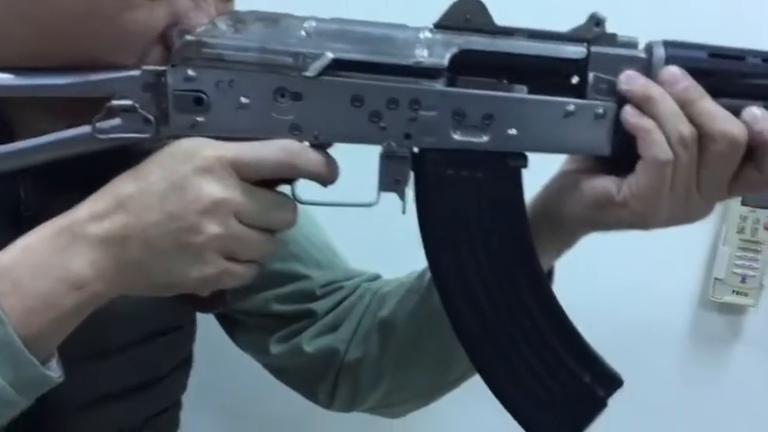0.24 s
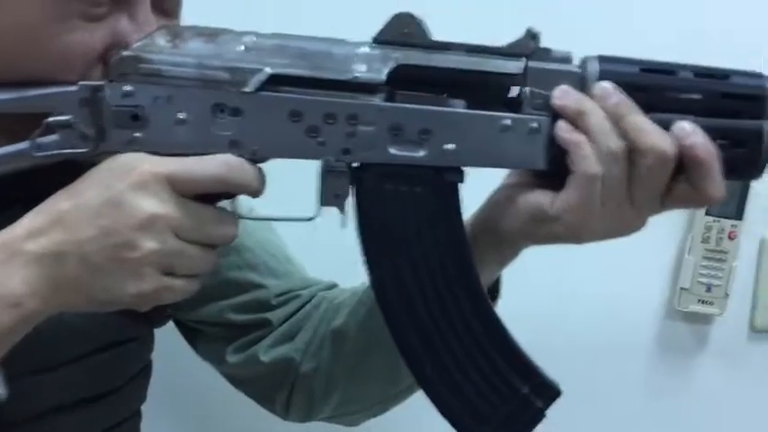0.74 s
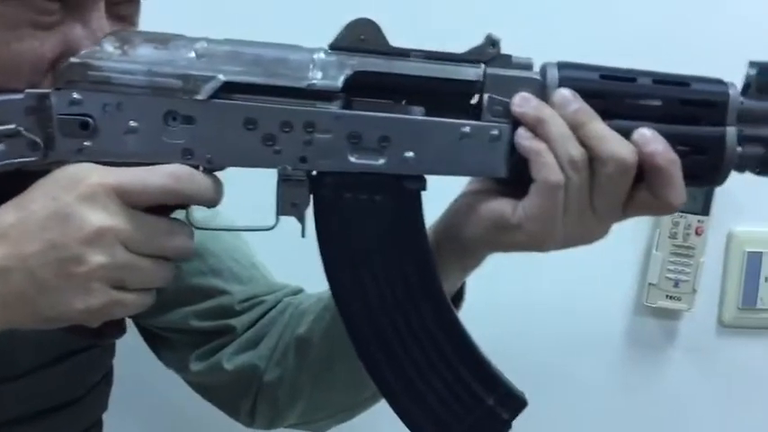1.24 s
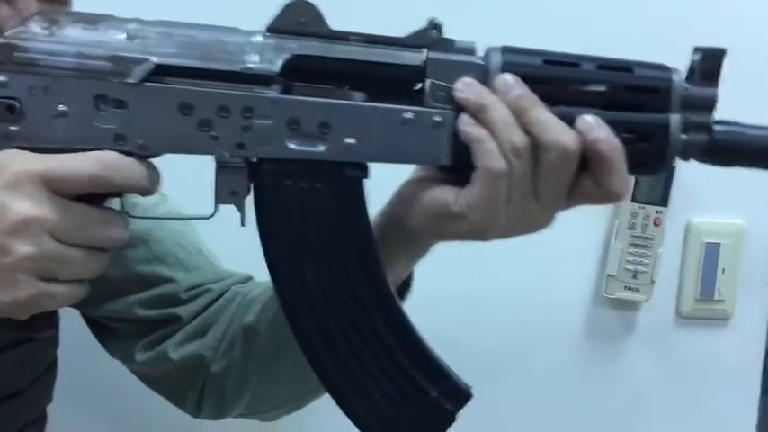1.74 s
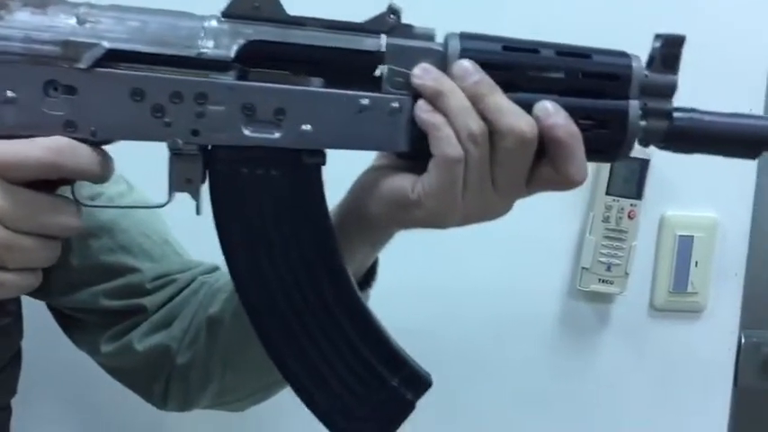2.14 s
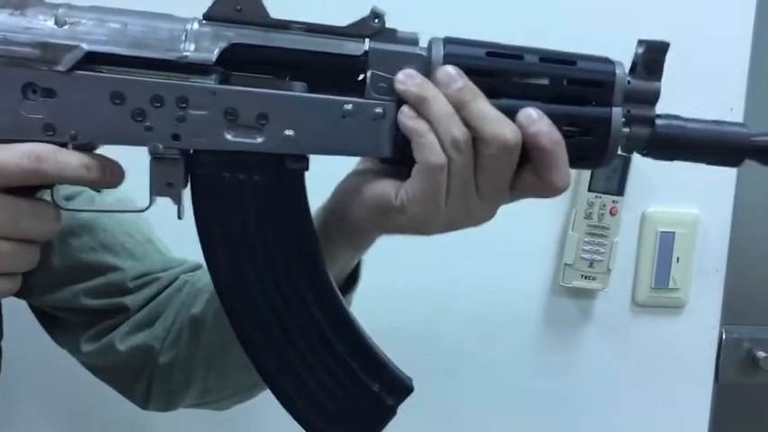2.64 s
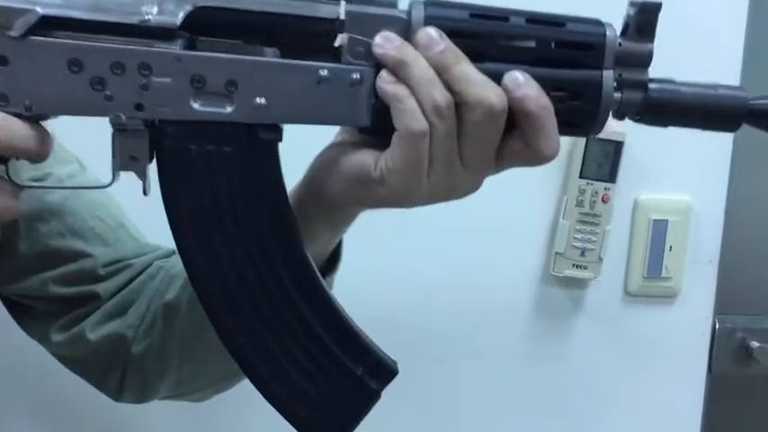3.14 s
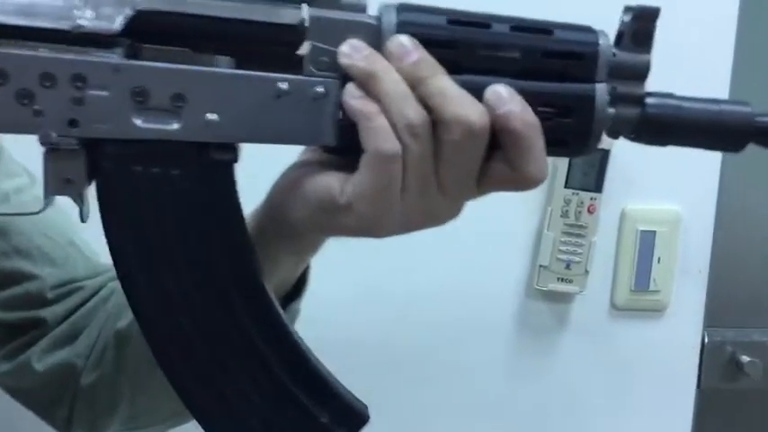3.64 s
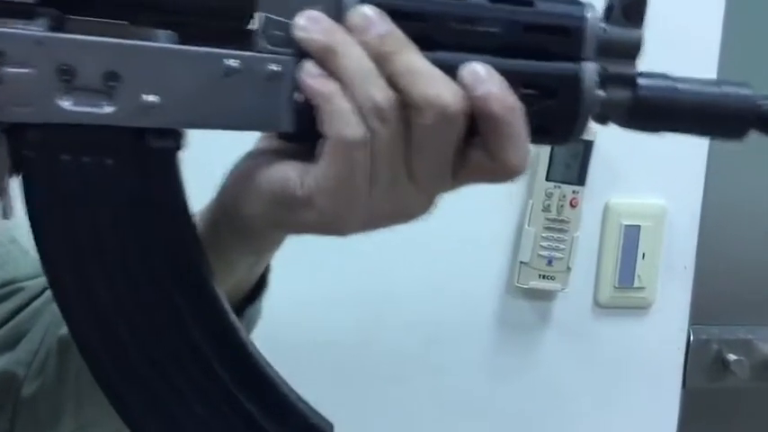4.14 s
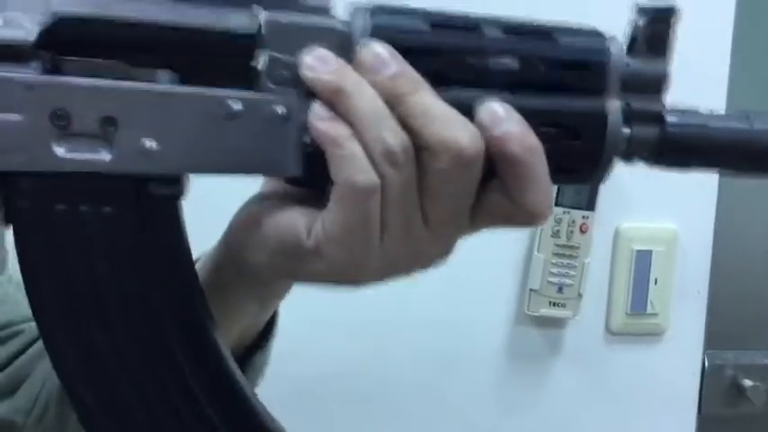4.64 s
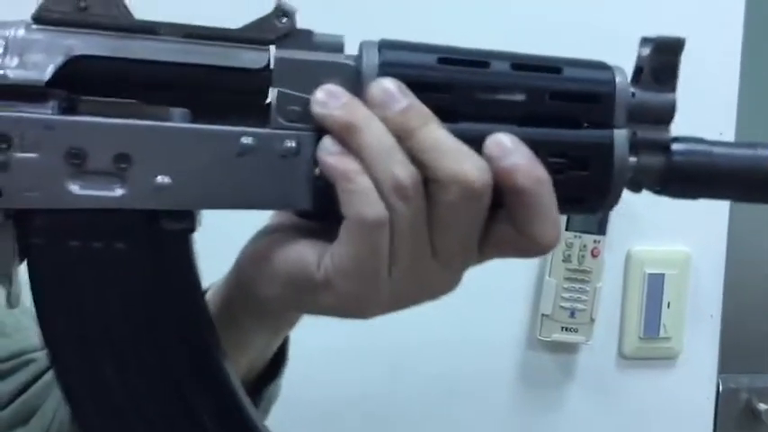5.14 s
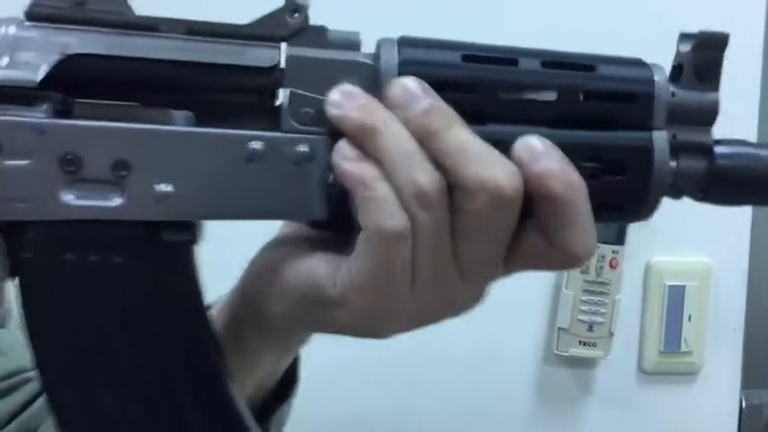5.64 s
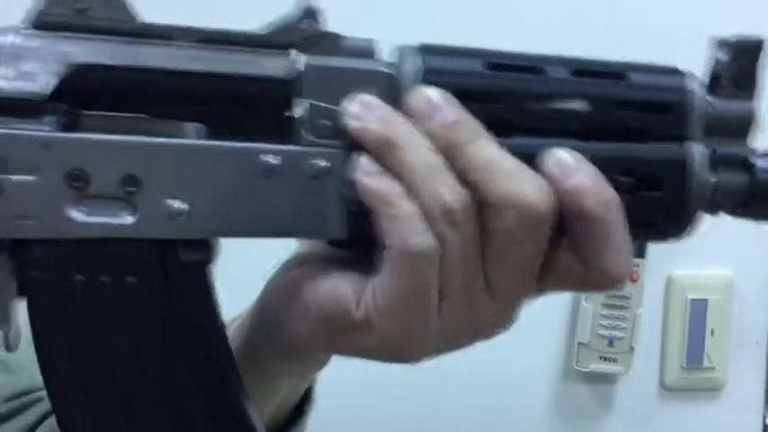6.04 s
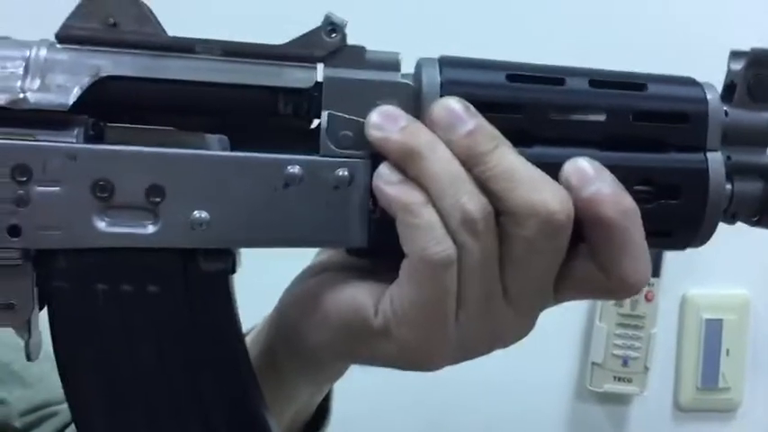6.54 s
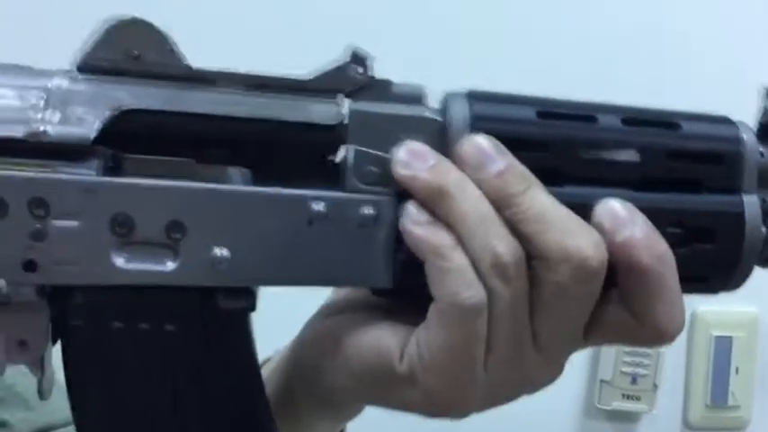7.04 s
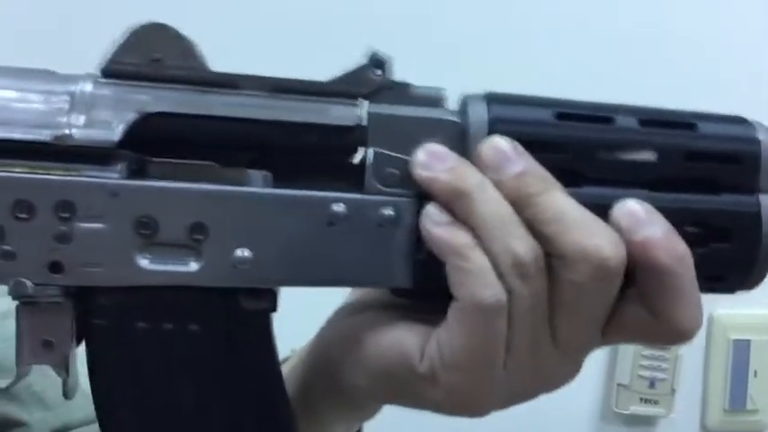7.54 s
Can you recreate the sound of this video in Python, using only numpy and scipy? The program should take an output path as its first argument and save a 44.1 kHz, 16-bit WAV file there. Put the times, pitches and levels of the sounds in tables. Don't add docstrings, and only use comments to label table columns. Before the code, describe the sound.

Close to a phone microphone in a small hard-walled room, cloth rustles faintly, then an electric airsoft rifle fires a long full-auto burst of popping, slamming metal cycles at about fourteen a second. After a short quiet gap comes a longer burst, then another brief pause and a third burst still running at the end. Gears whine throughout and the loudest slams overload.

```python
import sys
import numpy as np
from scipy import signal
from scipy.fft import rfft, irfft, next_fast_len
from scipy.io import wavfile
from scipy.ndimage import map_coordinates

SR = 44100
rng = np.random.default_rng(int(sys.argv[2]) if len(sys.argv) > 2 else 0)


def ratio_of_db(decibels):
    return 10 ** (np.asarray(decibels, float) / 20)


def materialize(psi):
    bounded = np.clip(np.atleast_2d(psi).T, -1, 1)
    quanta = np.round(bounded * 32767).astype(np.int16)
    wavfile.write(sys.argv[1], SR, quanta)


N = 343539

# (time [s], level [dB])
CLOTH_LEVEL = [(0, -62.5), (.1, -62.5), (.19, -64), (.22, -80.5), (.33, -84), (.345, -65), (.4, -67),
               (.44, -81), (.54, -61)]
# (frequency [Hz], level [dB per Hz])
CLOTH_COLOUR = [(300, -42), (600, -16), (2200, 2.5), (5500, -4.5), (7500, -6.5), (12000, -7.5),
                (15500, -17), (16000, -70)]
# (frequency [Hz], level [dB per Hz])
AIR_COLOUR = [(25, -25.5), (60, -13.5), (128, -12.5), (300, -23.5), (1200, -23), (4700, -31), (9000, -36.5),
              (16000, -69.5)]
# (time [s], gain [dB])
BACKGROUND_GAIN = [(0, 0), (.5, 5), (.6, 4), (3.17, -4), (6.7, -6)]
# (start [s], frequency [Hz], level [dB], 60 dB fade [s])
RINGING_SPRING = (6.365, 11017, -62, 1.4)
# (frequency [Hz], 60 dB fade [s])
ROOM_FADE = [(100, 0.1), (270, 0.74), (500, 0.43), (1000, 0.42), (4000, 0.67), (8000, 0.5), (15000, 0.26)]
# (frequency [Hz], level [dB])
ROOM_COLOUR = [(100, 7.5), (300, -0.5), (1000, -2.5), (4000, -12.5), (8000, -4.5), (15000, -4)]
# (delay [ms], level [dB])
WALL_ECHOES = [(8.6, -7), (16.3, -12), (24, -16)]

# (shot number [count], time [s])
SHOT_CLOCK = [
    [(0, .6054), (1, .6587), (7, 1.0706), (16, 1.6922), (29, 2.593), (30, 2.6631)],
    [(0, 3.2487), (1, 3.324), (8, 3.8121), (23, 4.8625), (37, 5.8464), (44, 6.3422)],
    [(0, 6.7648), (1, 6.8435), (9, 7.4098), (14, 7.7653)],
]
# (opening lift [dB], settling time [s], extra tick level [dB])
BURST_OPENING = [
    (6, 0.36, -3),
    (6, 0.2, 2.5),
    (3, 0.29, 4),
]
CYCLE_PARTS = {"piston": (-9.5, 0.98, 0.44), "tick": (-11.3, .6, 1.1), "slam": (-2.5, 0.48, .6),
               "bounce": (-8.5, .7, 0.66), "stock": (-24, 2.4, 1), "jolt": (-47, .2, 3)}
# (time [s], piston change [dB], extra bolt delay [ms], tick change [dB])
ODD_SHOTS = [
    (1.76, -3.5, 0, 0),
    (1.83, -0.5, 0, 1),
    (1.9, -2.5, 0.088, -1.5),
    (2.66, -3, 0.97, -3),
    (4.23, -3.5, .3, 5),
    (7.62, -2, 0, -4),
    (.61, 2, 0.84, 0.5),
    (6.76, 1, .8, -6),
    (2.8, 1, .4, 1),
]
# (time of the thump [s], level [dB])
HARD_JOLTS = [(0.625, -32), (3.264, -40), (3.325, -35.7), (3.431, -34.4), (3.778, -36.9), (4.13, -34),
              (4.266, -31), (4.478, -29.8), (4.617, -31), (4.76, -35), (5.109, -30), (5.601, -30),
              (5.668, -35.6), (5.743, -33), (5.814, -37), (5.879, -40), (5.952, -32.7), (6.167, -31),
              (6.236, -36), (6.306, -39), (6.376, -41), (6.881, -34), (6.946, -34), (7.017, -36.7),
              (7.092, -40), (7.376, -34), (7.517, -35.9), (7.66, -29.9)]

# (pull [s], release [s], running level [dB], starting strain [dB], coasting fade [dB per s])
TRIGGER_PULLS = [
    (.5505, 2.69, -20.5, 9, -180),
    (3.18, 6.36, -21.5, 8.5, -400),
    (6.706, 7.8, -21.5, 2.5, -300),
]
# (time after the piston [ms], frequency [Hz], level over the grind [dB])
WHINE_CYCLE = [
    (0, 3100, -14),
    (20, 3200, -12),
    (32, 3220, -7),
    (44, 3180, -2),
    (52, 3020, 1),
    (59, 2880, -1),
    (64, 2850, -12),
    (80, 2850, -16),
    (110, 2400, -30),
]
WHINE_WARMING = [
    -3.5,
    0.5,
    .3,
]
# (start [s], length [s], first pitch [Hz], last pitch [Hz], level [dB])
SPIN_UP_SQUEALS = [
    (0.555, 0.023, 800, 830, -16.5),
    (0.579, 0.013, 1500, 1630, -5),
    (0.588, 0.023, 1690, 1950, -15.5),
    (3.206, 0.017, 1436, 1720, -13),
    (3.234, 0.011, 1930, 2080, -12),
    (6.717, 0.021, 810, 855, -26.5),
    (6.738, 0.016, 1467, 1750, -13.5),
    (6.758, 0.016, 1785, 1950, -19),
]
# (frequency [Hz], width [Hz], level [dB])
GEARBOX_MODES = [(830, 197, -7.5), (1119, 78, -2.5), (1300, 860, -9), (2080, 1060, -6.5),
                 (3050, 1250, -6.5), (4500, 620, -8.5), (6010, 1030, -11.5), (9600, 850, -11.5),
                 (14000, 12000, -18)]
# (frequency [Hz], level [dB])
TICK_COLOUR = [(300, -25), (1000, -17), (2500, -16), (4000, 2), (5800, 4), (8000, -10.5), (12000, 1),
               (15200, 1.5)]

# (delay after the piston [ms], level under the slam [dB], 60 dB fade [ms])
RATTLE_HITS = [
    (5, -15, 12),
    (14, -20, 10),
    (17.8, -11, 8),
    (32.8, -13, 14),
]
# (time [s], level [dB])
LOOSE_CLICKS = [(0.384, -66.5), (0.5564, -20), (0.641, -10.5), (2.715, -22.5), (2.785, -45.5),
                (2.9947, -55), (3.1915, -37), (3.2856, -9.5), (3.3003, -7.5), (6.387, -21), (6.41, -26),
                (6.6044, -51), (6.713, -45), (6.799, -9.5)]
# (frequency [Hz], width [Hz], level [dB])
RECEIVER_MODES = [(665, 200, -4.5), (836, 70, 2), (1394, 158, 1), (1950, 180, -1), (2390, 220, -1.5),
                  (3084, 91, 6.5), (3506, 280, 1), (3880, 140, 2.5), (4380, 370, -1), (5530, 910, -3),
                  (7050, 430, -2.5), (8920, 1500, -7), (11200, 1200, -6), (13500, 2200, -9.5)]
# (frequency [Hz], width [Hz], level [dB])
CRACK_MODES = [(5930, 660, -5), (6530, 600, -0.5), (8900, 760, -5), (11870, 900, -2), (14100, 600, 0),
               (15500, 700, -2.5)]
# (frequency [Hz], width [Hz], level [dB])
FRAME_MODES = [(131.4, 21, -15), (159, 95, -11), (255.5, 1.8, -13), (260.9, 9, -2.5), (330, 280, -12)]
# (frequency [Hz], width [Hz], level [dB])
STOCK_MODES = [(279.4, 37, 2)]
# (frequency [Hz], width [Hz], level [dB])
CYLINDER_MODES = [(443, 102, -6), (536, 68, -2.5), (774, 67, -6.5), (866.6, 75, 4), (1514, 76, -10),
                  (1950, 92, -2), (3190, 160, -2), (3900, 1000, -22)]
# (frequency [Hz], level [dB])
PUFF_COLOUR = [(300, -29.5), (700, 2.5), (1000, 4), (3000, -1.5), (4500, -1), (6000, -7.5), (10000, -4.5),
               (15000, -7.5)]

AIR_DB, HUM_HZ, HUM_DB = -69, 122, -70
BOLT_MS, BOLT_SCATTER_MS, LAST_BOUNCE_DB = 21.7, 0.35, -3.5
SPIN_UP_S, SILENT_DB, STRAIN_S, EASE_S = 0.009, -27.5, 0.17, 0.13
JOLT_AFTER_S, JOLT_USUAL_DB, JOLT_HZ, JOLT_WIDTH_HZ = 0.036, -46, 71.6, 68
FRAME_S, STOCK_S = 0.002215, 0.00926


def unit(x):
    return x / np.sqrt(np.mean(x ** 2) + 1e-20)


def along(points, hz):
    f, value = np.transpose(points)
    return np.interp(np.log(hz + 1), np.log(f + 1), value)


def filtered(x, response):
    m = next_fast_len(N + SR // 2)
    return irfft(rfft(x, m) * response(np.fft.rfftfreq(m, 1 / SR)), m)[:N]


def resonant(x, modes, sign=-1):
    def response(f):
        total = 0
        for k, (center, width, db) in enumerate(modes):
            damping = 1j * f * width
            total = total + sign ** k * ratio_of_db(db) * damping / (center * center - f * f + damping)
        return total
    return filtered(x, response)


def coloured(x, spectrum):
    return filtered(x, lambda hz: ratio_of_db(along(spectrum, hz)))


def high(x, hz):
    return signal.sosfilt(signal.butter(4, hz, "high", fs=SR, output="sos"), x)


def thin(x, hz):
    return filtered(x, lambda f: f ** 4 / (f ** 4 + hz ** 4))


def wobble(rate):
    knots = rng.standard_normal(int(N * rate / SR) + 4)
    return map_coordinates(knots, [np.arange(N) * rate / SR])


def bursts(s, db, rise_ms, t60_ms, same=0.3):
    t_ms = np.arange(SR // 20) / SR * 1000
    shape = (1 - np.exp(-t_ms / rise_ms)) * ratio_of_db(-60 * t_ms / t60_ms)
    at = np.round(np.asarray(s) * SR).astype(int)[:, None] + np.arange(len(t_ms))
    repeated = same ** 0.5 * rng.standard_normal(len(t_ms))
    fresh = (1 - same) ** 0.5 * rng.standard_normal(at.shape)
    rows = shape * (repeated + fresh)
    rows = rows * np.linalg.norm(shape) / np.linalg.norm(rows, axis=1, keepdims=True)
    return np.bincount(at.ravel(), (ratio_of_db(db)[:, None] * rows).ravel(), N + SR)[:N]


def background():
    t = np.arange(N) / SR
    air = ratio_of_db(AIR_DB) * unit(coloured(rng.standard_normal(N), AIR_COLOUR))
    hum = ratio_of_db(HUM_DB + 2.5 * wobble(12)) * np.sin(2 * np.pi * HUM_HZ * t)
    cloth_db = np.interp(t, *np.transpose(CLOTH_LEVEL), right=-120) + 1.5 * wobble(60)
    cloth = ratio_of_db(cloth_db) * unit(coloured(rng.standard_normal(N), CLOTH_COLOUR))
    start, hz, db, t60 = RINGING_SPRING
    spring = (t > start) * ratio_of_db(db - 60 * abs(t - start) / t60) * np.sin(2 * np.pi * hz * t)
    gain = ratio_of_db(np.interp(t, *np.transpose(BACKGROUND_GAIN)))
    return (air + hum) * gain + cloth + spring


def room(x):
    hz, t, z = signal.stft(rng.standard_normal(SR), SR, nperseg=256)
    fade = ratio_of_db(-60 * t / along(ROOM_FADE, hz)[:, None])
    tail = signal.istft(z * fade, SR, nperseg=256)[1]
    delayed = np.pad(x, (400, 0))
    return coloured(signal.fftconvolve(delayed, tail / np.linalg.norm(tail))[:N], ROOM_COLOUR)


def nearest(s, rows):
    when, *columns = np.transpose(rows)
    at = np.abs(s[:, None] - when).argmin(axis=0)
    return [np.bincount(at, column, len(s)) for column in columns]


def cycles():
    s, lift, tick, last = [], [], [], []
    for points, (lift_db, settle_s, tick_db) in zip(SHOT_CLOCK, BURST_OPENING):
        number, when = np.transpose(points)
        own = np.interp(np.arange(number[-1] + 1), number, when)
        s = np.append(s, own)
        lift = np.append(lift, lift_db * np.exp(-(own - own[0]) / settle_s))
        tick = np.append(tick, tick_db + 0 * own)
        last = np.append(last, own == own[-1])
    odd_db, later_ms, odd_tick_db = nearest(s, ODD_SHOTS)
    hard_jolts = [(when, db - JOLT_USUAL_DB) for when, db in HARD_JOLTS]
    extra = {"piston": odd_db, "tick": tick + odd_tick_db, "bounce": LAST_BOUNCE_DB * last,
             "jolt": nearest(s + JOLT_AFTER_S, hard_jolts)[0]}
    shot = {}
    for name, (db, share, scatter_db) in CYCLE_PARTS.items():
        luck = rng.standard_normal(len(s))
        shot[name] = db + share * lift + scatter_db * luck + extra.get(name, 0)
    late_ms = BOLT_MS + later_ms + BOLT_SCATTER_MS * rng.standard_normal(len(s))
    return dict(shot, s=s, last=last, late_ms=late_ms)


def effort(t):
    level = 0
    for pull, let_go, run_db, strain_db, coast_db in TRIGGER_PULLS:
        u = np.clip(t - pull, 0, None)
        spin_up = SILENT_DB * np.exp(-u / SPIN_UP_S)
        strain = strain_db / (1 + np.exp(np.clip((u - STRAIN_S) / EASE_S * 2, -50, 50)))
        coast = coast_db * np.clip(t - let_go, 0, None)
        level = level + (t > pull) * ratio_of_db(run_db + spin_up + strain + coast)
    return level


def motor(shot):
    t = np.arange(N) / SR
    s = shot["s"]
    since_ms = 1000 * (t - s[np.clip(np.searchsorted(s, t) - 1, 0, None)])
    ms, hz, db = np.transpose(WHINE_CYCLE)
    pitch = np.interp(since_ms, ms, hz) * (1 + 0.014 * wobble(120))
    phase = 2 * np.pi * np.cumsum(pitch) / SR
    whine_db = np.interp(since_ms, ms, db) - 0.5 + 1.8 * wobble(60)
    whine = ratio_of_db(whine_db) * (np.sin(phase) + 0.23 * np.sin(2 * phase))
    whine = whine * ratio_of_db(np.interp(t, np.transpose(TRIGGER_PULLS)[1], WHINE_WARMING))
    rough = rng.standard_normal(N) * ratio_of_db(3.16 * wobble(300))
    grind = unit(high(resonant(rough, GEARBOX_MODES), 490))
    out = effort(t) * (grind + whine)
    for start, length, lo_hz, hi_hz, top_db in SPIN_UP_SQUEALS:
        u = np.clip((t - start) / length, 0, 1)
        turn = 2 * np.pi * np.cumsum(lo_hz + (hi_hz - lo_hz) * u) / SR
        swell = np.sin(np.pi * u ** 0.5)
        out = out + ratio_of_db(top_db) * swell * (np.sin(turn) + 0.62 * np.sin(2 * turn))
    return out


def release(shot):
    ticks = bursts(shot["s"] - 0.0091, shot["tick"] + 3.5, rise_ms=1.0, t60_ms=16.8)
    return coloured(ticks, TICK_COLOUR)


def recoil(shot):
    def kicks(late_s, db):
        at = np.round((shot["s"] + late_s) * SR).astype(int)
        return np.bincount(at, ratio_of_db(db), N + SR)[:N]

    def shake_twice(f):
        damping = 1j * f * JOLT_WIDTH_HZ
        return (damping / (JOLT_HZ ** 2 - f * f + damping)) ** 2

    frame = resonant(kicks(FRAME_S, shot["piston"] + 40.5), FRAME_MODES, sign=1)
    stock = resonant(kicks(STOCK_S, shot["stock"] + 50), STOCK_MODES, sign=1)
    jolt = filtered(kicks(shot["late_ms"] / 1000 + 0.0018, shot["jolt"] + 56.5), shake_twice)
    return thin(frame + stock, 110), jolt


def bolt(shot):
    s, slam_db = shot["s"], shot["slam"]
    home = s + shot["late_ms"] / 1000
    hits = bursts(home + 0.0004, slam_db + 9, rise_ms=0.3, t60_ms=16.1, same=0.4)
    bounce_s = home + 0.0062 + rng.normal(0, 0.0003, len(s))
    hits = hits + bursts(bounce_s, shot["bounce"] + 7, rise_ms=0.2, t60_ms=21.7)
    for ms, db, t60_ms in RATTLE_HITS:
        luck = rng.standard_normal((len(s), 2))
        rattle_s = s + ms / 1000 + 0.00037 * luck[:, 0]
        rattle_db = slam_db + 11.5 + db + 1.1 * luck[:, 1]
        hits = hits + bursts(rattle_s, rattle_db, rise_ms=0.19, t60_ms=t60_ms)
    when, db = np.transpose(LOOSE_CLICKS)
    hits = hits + bursts(when, db + 19.0, rise_ms=0.18, t60_ms=8.7, same=0)
    crack = resonant(bursts(home, slam_db + 10.5, rise_ms=0.072, t60_ms=7.9), CRACK_MODES)
    catch = bursts(s + 0.0445, slam_db - 12 * shot["last"], rise_ms=4.2, t60_ms=13)
    pickup = resonant(catch, [(4570, 1300, 6.5), (9000, 4600, -1.5)])
    return high(resonant(hits, RECEIVER_MODES), 420) + crack + pickup


def piston(shot):
    s, db = shot["s"], shot["piston"]
    at = np.round((s + 0.0009) * SR).astype(int)
    push = np.bincount(at, -ratio_of_db(db + 38.5), N)

    def walls(f):
        echoes = sum(ratio_of_db(g) * np.exp(-2j * np.pi * f * ms / 1000) for ms, g in WALL_ECHOES)
        return echoes / (1 + 1j * f / 1200)

    uneven = bursts(s, db + 10.5, rise_ms=0.83, t60_ms=24, same=0)
    knock = push + filtered(push, walls) + uneven
    air = bursts(s - 0.0003, db + 6, rise_ms=0.6, t60_ms=19)
    return thin(resonant(knock, CYLINDER_MODES, sign=0.95), 270) + ratio_of_db(3.5) * coloured(air, PUFF_COLOUR)


def scene():
    quiet = background()
    shot = cycles()
    body, jolt = recoil(shot)
    rifle = motor(shot) + release(shot) + body + bolt(shot) + piston(shot)
    return (quiet + jolt + rifle + ratio_of_db(-8.5) * room(rifle))[None]


def low_pass(x):
    return signal.sosfilt(signal.butter(12, 16710, fs=SR, output="sos"), x)


def record(dry):
    x = dry / (1 + np.abs(dry / 0.95) ** 5) ** (1 / 5)
    x = filtered(high(x[0], 33), lambda f: 1 - 0.45 / (1 + ((f - 10400) / 450) ** 2))
    x = coloured(x, [(15550, 0), (15850, -38), (16600, -42), (16800, -70)])[None]
    return low_pass(x)


dry = scene()
out = record(dry)
materialize(out)
```